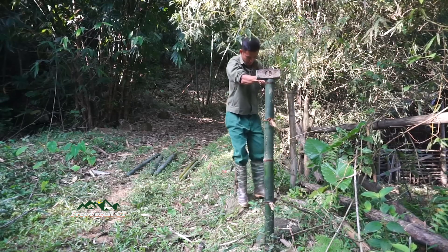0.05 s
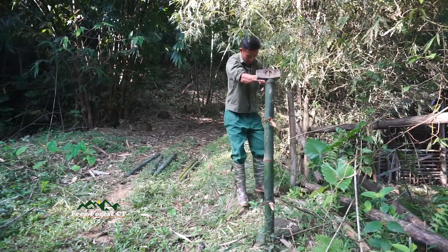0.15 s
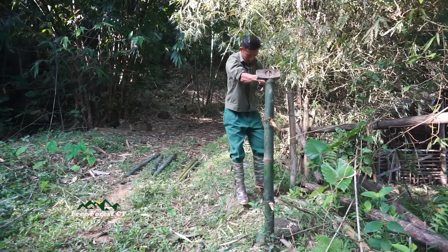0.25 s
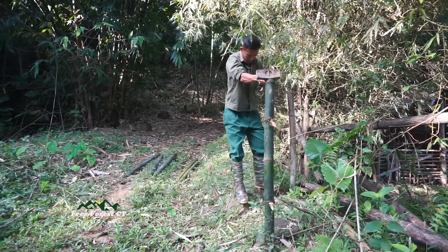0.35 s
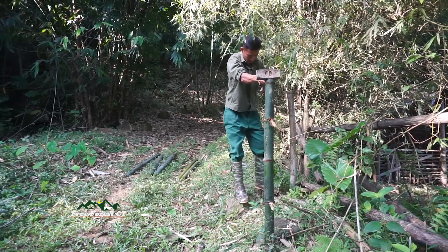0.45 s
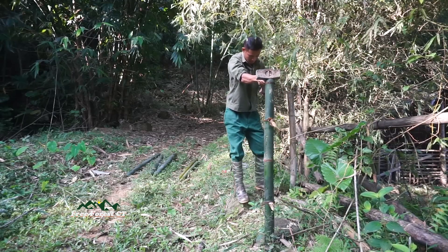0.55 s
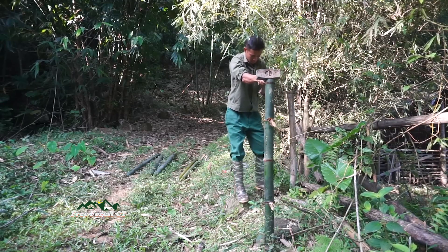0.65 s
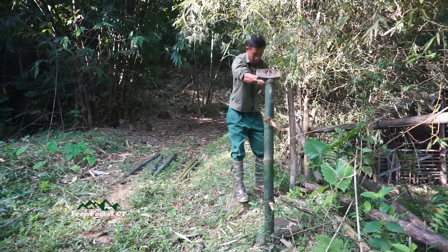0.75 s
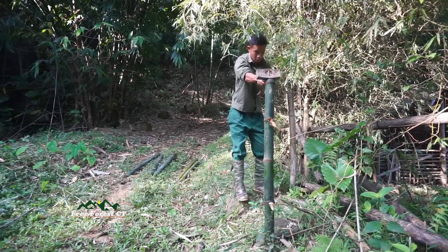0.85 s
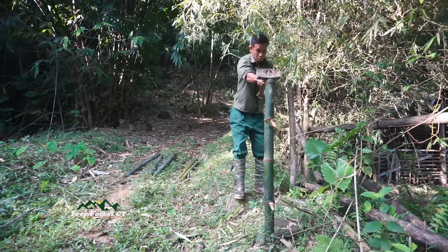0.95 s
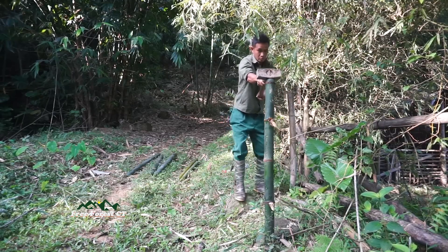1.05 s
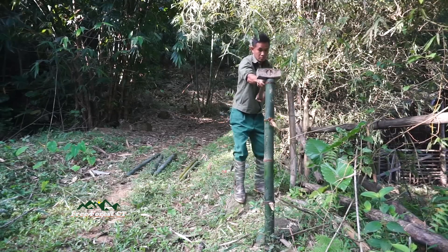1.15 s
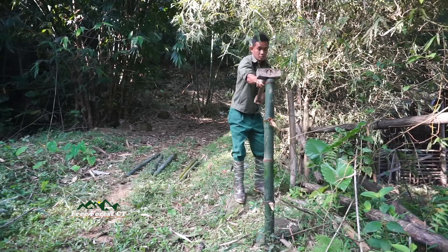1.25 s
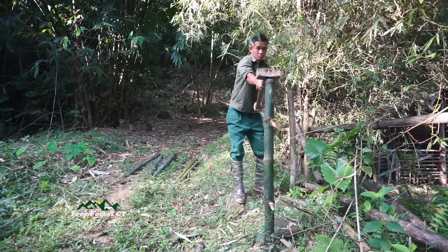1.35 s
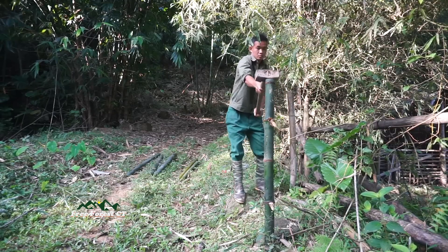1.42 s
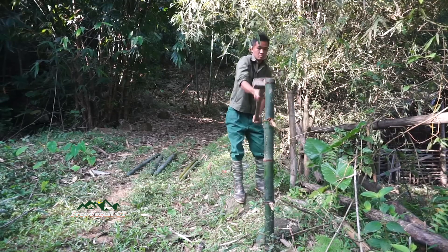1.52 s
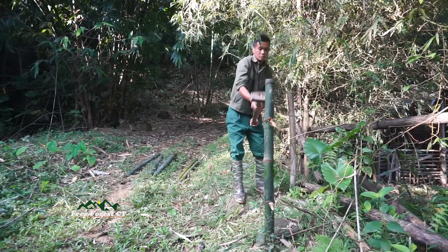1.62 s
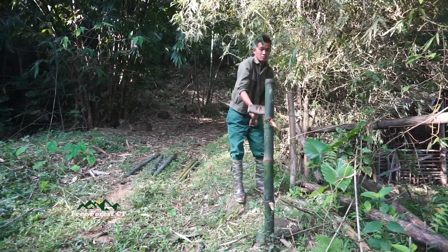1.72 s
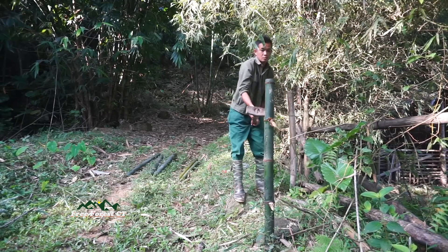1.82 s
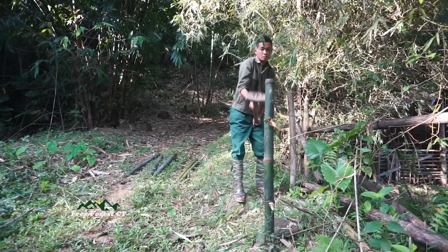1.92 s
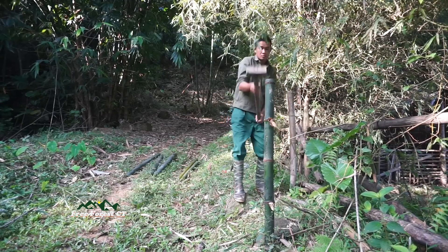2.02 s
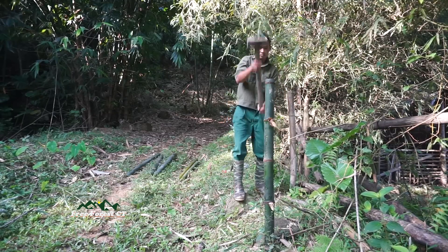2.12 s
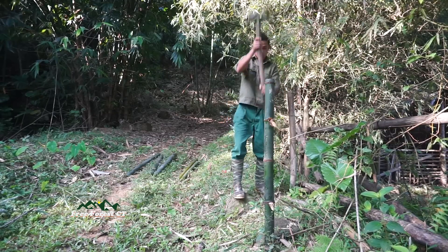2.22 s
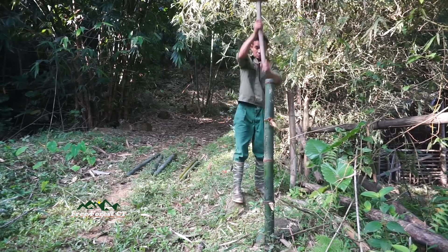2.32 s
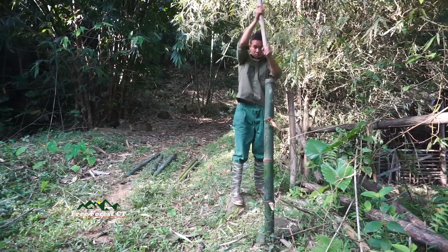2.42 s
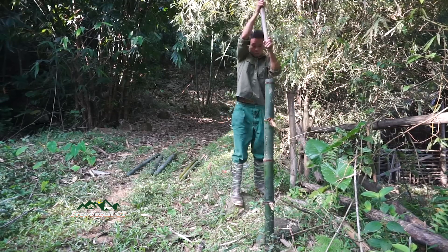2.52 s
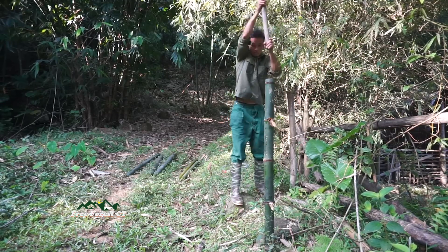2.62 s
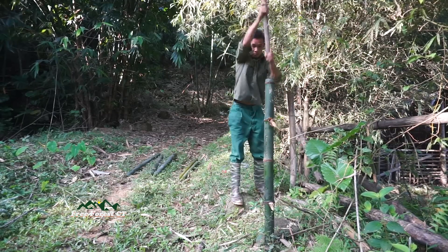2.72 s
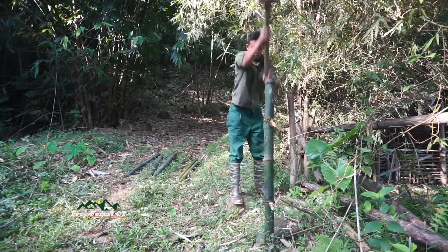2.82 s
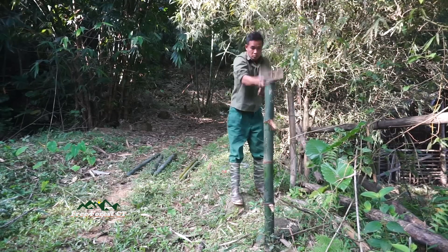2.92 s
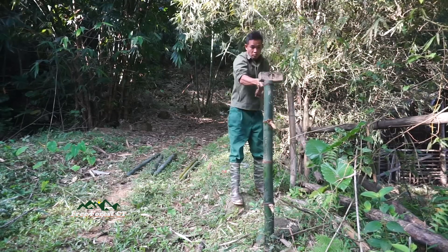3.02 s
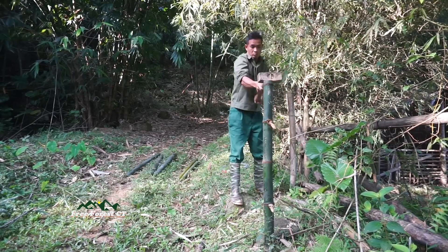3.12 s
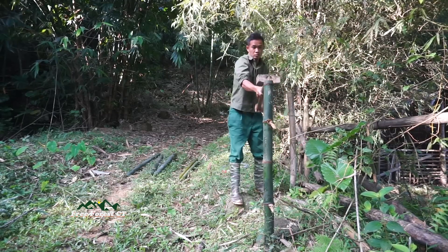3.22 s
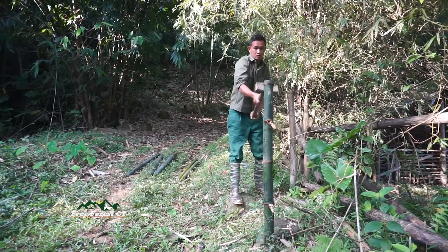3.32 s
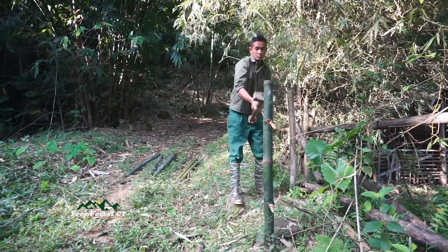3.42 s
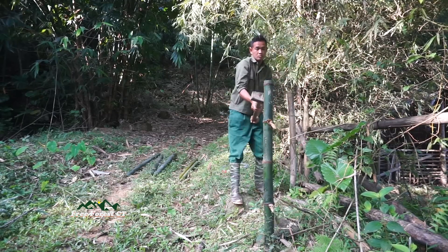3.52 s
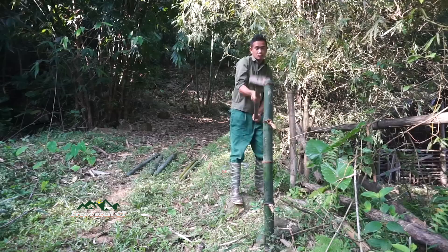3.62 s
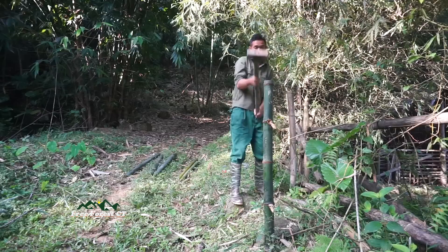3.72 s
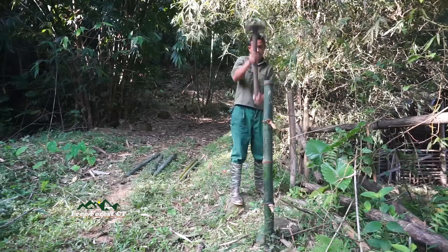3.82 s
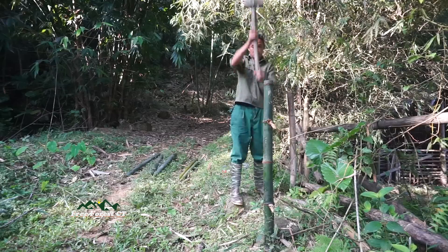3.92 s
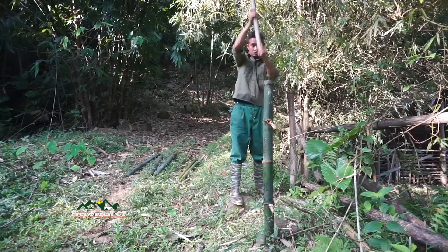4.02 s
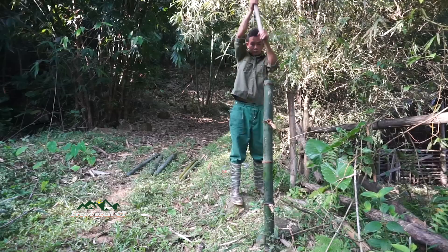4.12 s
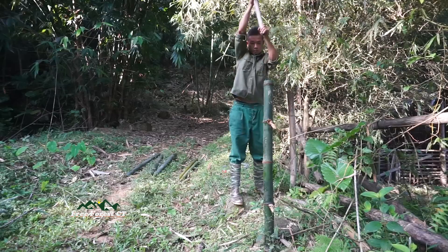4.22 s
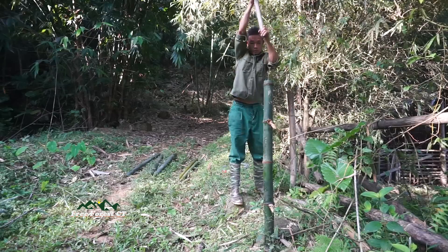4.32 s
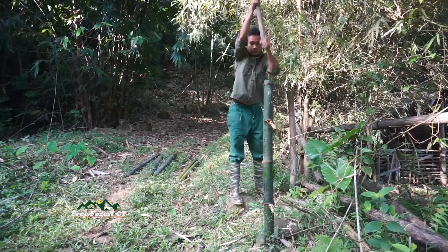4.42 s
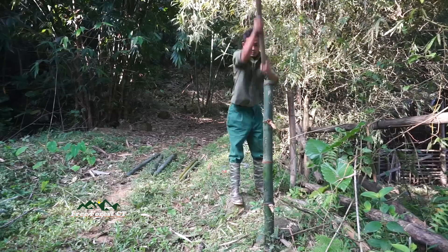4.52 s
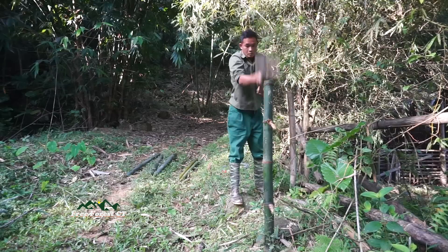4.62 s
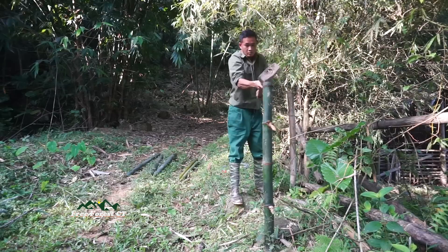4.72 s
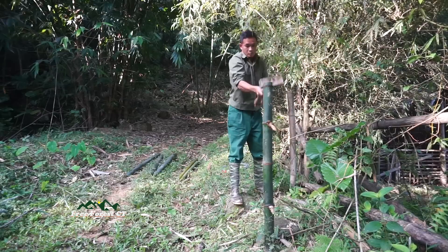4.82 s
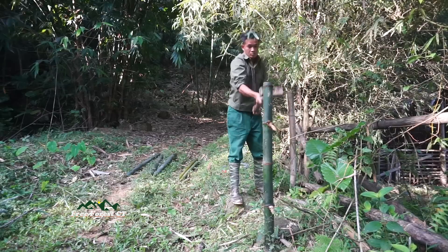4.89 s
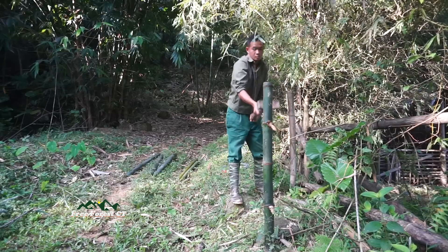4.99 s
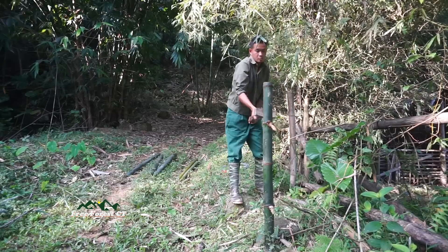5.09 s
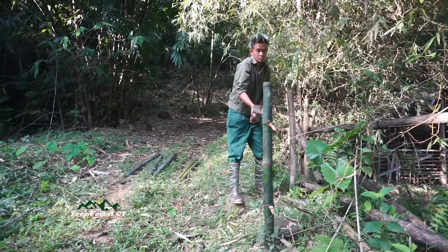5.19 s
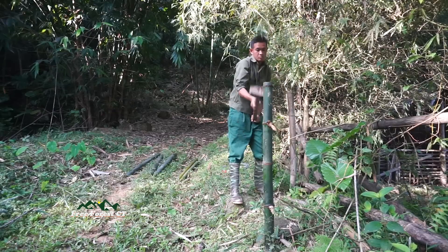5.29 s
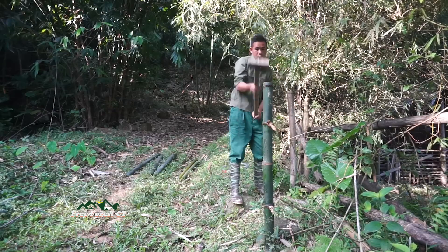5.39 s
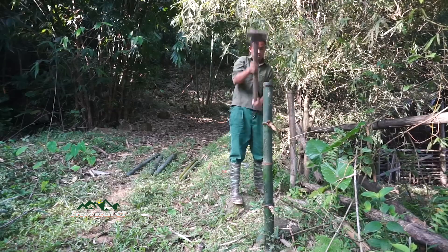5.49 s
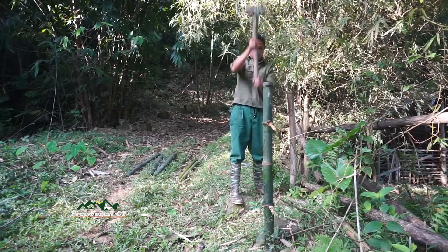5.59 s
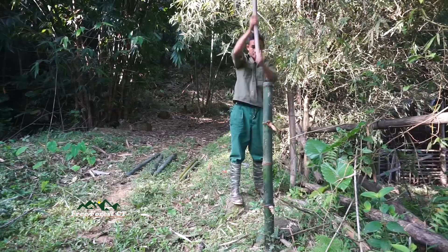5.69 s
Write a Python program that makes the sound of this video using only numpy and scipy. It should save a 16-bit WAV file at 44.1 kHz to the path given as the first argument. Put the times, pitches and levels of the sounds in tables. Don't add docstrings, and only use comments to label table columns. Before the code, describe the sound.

Two sharp, hollow knocks of a mallet on a green post echo through a forest over steady high insect drone and faint brook gurgles.

```python
import sys
import numpy as np
from scipy import signal
from scipy.fft import rfft, irfft, next_fast_len
from scipy.io import wavfile

SR = 44100
rng = np.random.default_rng(int(sys.argv[2]) if len(sys.argv) > 2 else 0)


def level_to_linear(level):
    exponent = np.asarray(level, float) / 20
    return 10 ** exponent


def int16_out(signal):
    q = np.round(np.clip(np.atleast_2d(signal).T, -1, 1) * 32767)
    wavfile.write(sys.argv[1], SR, q.astype(np.int16))


N = 253575

# start in seconds, swell of echoes in dB, ring of the steel in dB,
# steel pitch in Hz, seconds until the head is pulled away, rise of the ring in seconds.
BLOWS = [
    (2.989, -21, -28, 7038, 0.32, .029),
    (4.699, -21, -33.5, 7037, 0.35, .022),
]
# start in seconds, mode of the post in Hz, level in dB, t60 in seconds.
JOLTS = [(2.9890, 5300, -14, .0015), (2.9890, 10300, -30, .004), (2.9890, 2170, -14.5, 0.014),
         (2.9922, 2250, -22, .014), (2.9912, 6200, -25, .004), (2.9915, 1150, -19, .012),
         (2.9890, 3400, -22, 0.015), (2.9891, 5000, -31, .008), (2.9891, 7000, -22, .005),
         (2.9896, 6300, -29, 0.0071), (2.9884, 1300, -33, 0.0045), (2.9903, 3200, -36, 0.0066),
         (2.9912, 790, -14.5, 0.025), (2.99, 1028, -20, 0.05), (2.9940, 1500, -17, 0.009),
         (2.9915, 500, -21, 0.03), (2.9915, 290, -30, 0.017), (2.9968, 707, -17, 0.028),
         (2.9875, 3000, -36, .006), (3.001, 900, -25, .015), (3.0857, 680, -23.5, 0.019),
         (3.0855, 490, -34, 0.0099), (4.6996, 2450, -15.5, 0.0075), (4.6998, 5400, -14, 0.0027),
         (4.6996, 8160, -23.5, 0.0044), (4.7012, 1080, -16.5, 0.014), (4.702, 1300, -21, 0.04),
         (4.7035, 3030, -25, 0.011), (4.7030, 540, -22, 0.022), (4.7068, 510, -23, .025),
         (4.7125, 2500, -25, .012), (4.7035, 4200, -25, .01), (4.7045, 1400, -23, .012),
         (4.6997, 9900, -26, .004), (4.7048, 5100, -23, .006), (4.7030, 270, -33, 0.07),
         (4.7066, 720, -21, 0.025), (4.7083, 1250, -18.5, 0.026), (4.7108, 2050, -23, 0.022),
         (4.7172, 1450, -26, 0.015)]
# time in seconds, loss left in dB,
# loss right in dB, half width in seconds, extra lag of the right port in radians.
DEAD_SIDES = [(3.016, 10, 8, .003, 0), (4.723, 6, 6, .002, 0), (4.78, 10, 10, .004, .8),
              (3.176, 3.5, 1, 0.024, 0.15), (3.312, 4.5, 3, .012, 0), (3.355, 7.5, 6, 0.019, -.3),
              (3.436, 11, 7, 0.024, .2), (3.54, 0.5, 5, 0.055, .3), (4.805, 10, 12, 0.014, 1.2),
              (4.873, 11, 4, 0.009, .6), (4.91, 7, 0, .02, 1.3), (4.973, 10, 5, 0.0097, 0),
              (5.006, 11, 10, 0.015, .8), (5.04, 6, 3, .02, 0), (5.073, 12, 5, 0.0067, 0),
              (5.11, 14, 12, 0.008, 0), (5.2, 26, 10, 0.034, 2.0), (5.3, 8, 4, 0.013, 0)]
# mode in Hz, level in dB, t60 in seconds.
POST_VOICES = [
    [(1280, -15, 0.04), (2510, -15, 0.03), (2210, -19, .04), (3260, -18, .02), (3670, -18, 0.03)],
    [(1270, -13, 0.05), (1930, -16, 0.022), (2200, -18, .025), (2940, -19, .025), (3240, -20, .025),
     (3550, -19, .03)],
]
# frequency in Hz, level in dB.
ECHO_COLOUR = [(100, -78), (200, -18.5), (330, -17.5), (650, -1.5), (1000, -6), (1280, 0), (1760, 0),
               (2500, 0), (3600, -2), (5200, -6.5), (7500, -8.5), (9500, -18), (11300, -12.5)]
# frequency in Hz, change in dB per second.
ECHO_LOSS = [(150, -30), (400, -56), (1000, -9), (3000, -17), (5500, -38), (8000, -34), (11000, -56)]
# frequency in Hz, likeness from 0 to 1.
ECHO_ALIKE = [(150, 0.93), (600, .96), (1200, .95), (2300, 0.85), (4000, 0.62), (5800, .5), (9000, 0.3)]
# strongest rustle in seconds, level in dB, rise in seconds, fall in seconds.
MOVES = [(.32, -56.5, 0.12, 0.12), (2.3, -53, .1, 0.13), (2.49, -51.5, 0.094, 0.077),
         (2.73, -53.5, 0.063, 0.13), (3.93, -58.5, 0.021, 0.18), (4.2, -49.5, 0.14, 0.059),
         (4.5, -61.5, 0.22, 0.18), (5.75, -54.5, 0.17, .1)]
# frequency in Hz, level in dB per Hz.
RUSTLE_COLOUR = [(300, -13), (700, 6), (1500, -6), (3000, -2), (6000, 0), (8000, 4), (11300, 5.5)]
# frequency in Hz, likeness from 0 to 1.
RUSTLE_ALIKE = [(300, 0.61), (11000, 0.77)]
# start in seconds, level in dB, low edge in Hz, high edge in Hz, t60 in seconds.
SNAPS = [(2.258, -41, 2000, 6000, .03), (2.277, -39, 1800, 4000, 0.022), (2.372, -36, 7000, 10000, .008),
         (2.4515, -28, 2200, 12100, 0.025), (2.4562, -28.5, 2200, 12200, 0.018),
         (2.459, -36, 2500, 11000, .03), (2.462, -29, 6300, 8000, 0.03), (2.4622, -31, 9000, 11600, 0.03),
         (2.466, -38.5, 1500, 11000, 0.048), (2.71, -34, 6000, 9000, 0.035),
         (3.909, -36, 5000, 10000, .012), (3.954, -36, 4000, 8000, .015), (3.989, -46, 4000, 9000, .01),
         (4.148, -29, 5000, 14000, 0.013), (4.189, -50, 6000, 11000, .03), (4.324, -40, 5000, 11000, .01),
         (4.331, -35, 4000, 12000, .015), (5.603, -39.5, 2000, 9000, 0.021)]
# middle in seconds, level in dB.
PUFFS = [(2.319, -73), (2.449, -75), (3.07, -72), (4.719, -68), (4.86, -86), (5.598, -76)]
# start in seconds, peak in dB, pitch in Hz.
GURGLES = [(0.0543, -56, 1120), (0.1191, -51, 1130), (0.1446, -44.5, 1090), (0.386, -45.5, 1110),
           (0.5117, -48, 1130), (0.5641, -44.5, 1130), (0.612, -47, 1130), (0.8106, -47, 1130),
           (0.8894, -45.5, 1090), (0.9996, -40, 1130), (1.3528, -42, 1070), (1.709, -45.5, 1170),
           (1.8427, -46.5, 1350), (1.956, -47, 1016), (1.9754, -48, 996), (2.0303, -51, 1130),
           (2.2099, -49, 1064), (2.4154, -45.5, 1075), (2.4553, -49, 1160), (2.7501, -43.5, 1130),
           (2.7716, -47, 1380), (3.5691, -45.5, 1130), (3.6209, -41.5, 1160), (4.1837, -44.5, 1130),
           (4.3079, -48, 1150), (4.4062, -48, 1170), (4.6092, -56, 1105), (5.3204, -47, 1180),
           (5.501, -44, 1130), (5.5699, -41, 1130)]
# start in seconds, peak in dB, pitch in Hz.
GLUGS = [(0.043, -51.5, 333), (0.204, -55, 276), (0.368, -47, 830), (0.82, -48.5, 372), (0.936, -54, 404),
         (1.0, -46.5, 532), (1.074, -51, 403), (1.341, -58, 336), (1.874, -54, 520), (1.976, -54, 830),
         (2.032, -44, 433), (2.23, -48.5, 536), (2.493, -51, 830), (2.825, -52, 363), (2.941, -54, 340),
         (3.543, -49, 584), (3.77, -53.5, 330), (3.928, -52, 367), (4.128, -50, 690), (4.294, -49.5, 497),
         (4.354, -48.5, 398), (4.399, -53, 514), (4.661, -47, 584), (1.723, -56, 510), (2.392, -53, 490),
         (3.955, -47, 810), (3.98, -55, 292), (4.44, -51, 522), (5.463, -55, 524), (5.592, -54.5, 368)]
# multiple of its pitch, level in dB.
OVERTONES = [(1.26, -12), (1.95, -17), (2.5, -20)]
# time in seconds, level in dB.
FLOW = [(0, 4), (.15, -4.5), (.65, -4), (.9, 0), (1.5, -1.5), (1.86, 0.5), (2.1, -5), (2.4, 0.5),
        (2.58, -5.5), (2.85, 0), (3.65, -2.5), (4.45, -2), (5.2, 1), (5.5, -5.5), (5.75, -0.5)]
# mode in Hz, level to the pool in dB, t60 in seconds.
NARROW_PATTER = [(1130, 1.5, 0.049), (1228, -3.5, 0.027), (1025, -6.5, 0.072), (1416, -6.5, 0.039),
                 (2200, -6, 0.015)]
# mode in Hz, level to the pool in dB, t60 in seconds.
WIDE_PATTER = [(327.5, -6.5, 0.028), (417.7, -7, 0.06), (517, -4, 0.045), (720, -35, 0.027)]
# pitch in Hz, width in Hz, wing strokes per second,
# stroke depth from 0 to 1, level to the chorus in dB, likeness at the ports from 0 to 1.
CHOIRS = [(4615, 246, 100, 0.04, -2, 0.71), (4671, 392, 140, 0.12, -1, 0.8), (7065, 650, 90, 0.06, -6, .6),
          (8735, 710, 100, 0.43, -4.5, 0.65)]
# pitch in Hz, width in Hz, wing strokes per second,
# stroke depth from 0 to 1, level to the chorus in dB, likeness at the ports from 0 to 1.
THROBBERS = [(9480, 580, 73, 0.02, -2, .7), (8840, 200, 140, .2, -6.5, .7)]
# time in seconds, throbs per second of the high one, of the low one.
THROB_PER_S = [(0, 4.33, 4.02), (1.2, 4.45, 4.16), (1.6, 4.65, 4.21), (5.75, 4.57, 4.69)]
# frequency in Hz, level in dB per Hz.
AIR_COLOUR = [(25, -44), (60, -30), (120, -21.5), (200, -16.5), (300, -7), (700, -2), (1600, -3),
              (3000, -3), (3900, -4), (5600, -7), (7800, -9.5), (10300, -6), (11300, -11.5)]
# frequency in Hz, likeness from 0 to 1.
AIR_ALIKE = [(100, 0.75), (300, 0.75), (700, 0.6), (1500, 0.65), (2500, .45), (5500, 0.3), (10000, 0.4)]
# time in seconds, pitch in Hz, level in dB.
CROW = [(5.59, 495, -68), (5.63, 503, -63), (5.66, 510, -55), (5.7, 512, -56), (5.75, 514, -56)]
# multiple of the pitch, level in dB.
CROW_PARTIALS = [(1, -2), (2, 1.5), (3, -8), (4, -5), (5, -15)]
# frequency in Hz, loss in dB.
DULLER = [(100, 3), (250, 0.5), (600, 2.5), (1100, 4), (2000, 5), (3600, 8.5), (6400, 10.5), (11400, 10.5)]
# frequency in Hz, phase lead in radians.
LEAD = [(60, 0.25), (290, 1.33), (500, 1.72), (1100, 1.93), (2500, 1.82), (11000, 1.67)]

POST_LAG_S, STEEL_LAG_RAD = 1.6e-5, .6
THUD_S, THUD_HZ, THUD_DB, THUD_T60_S = 3.0845, 215, -38, .025
STEEL_LOSS_DB_PER_S, STEEL_AWAY_DB_PER_S, STEEL_SAG_HZ_PER_S = 24, 53, 14.1
GROUND_DB = -11, -6
GROUND_RISE_S, GROUND_T60_S = .006, 0.11
TRUNKS_RISE_S, TRUNKS_T60_S = 0.088, .5
FAR_DB, FAR_T60_S = -10, 1.253
VOICE_LOSS_DB_PER_S = 35
NARROW_DB, WIDE_DB, POOL_SWAY_DB = -64, -62.5, 2.2
POOL_ALIKE = .75
SPLASHES_PER_S, SPLASH_DB, SPLASH_CYCLES = 65, -70, 40.0
CHORUS_DB, CHORUS_SWAY_DB = -53.5, 0.04
THROB_GAP_TURNS, THROB_DEPTH_DB = .25, (-13, -9)
DUCK_DB, DUCK_AFTER_S, DUCK_RECOVER_S = 2, 0.082, 0.4
BASS_CUT_HZ = 250


def rms_one(x):
    return x / np.sqrt(np.mean(x ** 2) + 1e-20)


def in_time(rows, off=None):
    s, *columns = np.transpose(rows)
    return [np.interp(np.arange(N) / SR, s, c, off, off) for c in columns]


def at_hz(points, hz):
    points_hz, values = np.transpose(points)
    return np.interp(np.log(hz), np.log(points_hz), values)


def age_after(s):
    return np.maximum(np.arange(N) / SR - s, 0)


def drift(rate, count=N):
    r = np.exp(-80 * np.pi * rate / SR)
    noise = rng.standard_normal(N // 40 + 2002)
    slow = signal.lfilter([1], [1, -2 * r, r * r], noise)[2000:]
    return np.interp(np.arange(count) / 40, np.arange(len(slow)), rms_one(slow))


def ring(clicks, hz, t60):
    r, w = level_to_linear(-60 / (t60 * SR)), 2 * np.pi * hz / SR
    return signal.lfilter([0, np.sin(w)], [1, -2 * r * np.cos(w), r * r], clicks + 1e-18)


def band(x, low_hz, high_hz):
    return signal.sosfilt(signal.butter(2, [low_hz, high_hz], "band", fs=SR, output="sos"), x)


def bass_cut(x):
    return signal.sosfilt(signal.butter(4, BASS_CUT_HZ, "high", fs=SR, output="sos"), x)


def ports(pair, alike):
    alike = np.clip(alike, 0, 1)
    return np.array([pair[0], alike * pair[0] + np.sqrt(1 - alike ** 2) * pair[1]])


def grains(per_s, spread_db, shape):
    sizes = level_to_linear(spread_db * np.minimum(rng.exponential(1, shape), 5)) * rng.choice([-1, 1], shape)
    return rms_one(sizes * (rng.random(shape) < per_s / SR))


def coloured(source, band_db, alike, from_octave=0):
    out, edges = 0, 22 * 2 ** np.arange(from_octave, 9.4, 1 / 3)
    for k, (low, high) in enumerate(zip(edges, edges[1:])):
        hz = np.sqrt(low * high)
        out = out + level_to_linear(band_db(hz)) * ports(band(source[k % 2], low, high), at_hz(alike, hz))
    return out


def place(out, s, sound):
    at, out = round(s * SR), out.copy()
    out[..., at:at + sound.shape[-1]] += sound[..., :N - at]
    return out


def blows():
    out, click = np.zeros(N), 1. * (np.arange(4000) == 0)
    for s, hz, db, t60 in JOLTS:
        out = place(out, s, level_to_linear(db) * ring(click, hz, t60))
    thud = level_to_linear(THUD_DB) * band(ring(click, THUD_HZ, THUD_T60_S), 144, 600)
    out = place(bass_cut(bass_cut(out)), THUD_S, thud)
    late = np.interp(np.arange(N) - POST_LAG_S * SR, np.arange(N), out)
    return np.array([out, late]) * level_to_linear([[-.5], [1.6]])


def steel():
    t, out, turning = np.arange(N) / SR, 0, 0
    for s, left_db, right_db, width, lag in DEAD_SIDES:
        turning = turning + np.exp(-((t - s) / width) ** 2) * np.array([[left_db], [right_db], [lag]])
    lags = np.array([0 * t, STEEL_LAG_RAD + turning[2]])
    for s, _, db, hz, away_s, rise_s in BLOWS:
        age = age_after(s)
        fade_db = -STEEL_LOSS_DB_PER_S * age - STEEL_AWAY_DB_PER_S * np.maximum(age - away_s, 0)
        turns = (hz - STEEL_SAG_HZ_PER_S * age / 2) * age
        swell = 1 - np.exp(-(age / rise_s) ** 2)
        out = out + level_to_linear(db + fade_db) * swell * np.sin(2 * np.pi * turns - lags)
    return np.sqrt(2) * level_to_linear(-turning[:2]) * out


def answer(age, ground_db):
    forest = level_to_linear(-120 * age / TRUNKS_T60_S) + level_to_linear(2 * FAR_DB - 120 * age / FAR_T60_S)
    late = 1 - np.exp(-(age / TRUNKS_RISE_S) ** 3)
    gather = 1 - np.exp(-(age / GROUND_RISE_S) ** 2)
    soil = gather * level_to_linear(2 * ground_db - 120 * age / GROUND_T60_S)
    return np.sqrt(soil + late * forest)


def echoes():
    out = np.zeros((2, N))
    age = np.arange(round(.8 * SR)) / SR
    for (s, swell_db, *_), tilt_db, voice, ground_db in zip(BLOWS, (.1, -.5), POST_VOICES, GROUND_DB):
        trunks = grains(6000, 2.1, (2, 2, len(age)))

        def band_db(hz):
            clumps_db = 1.5 * drift(45, count=len(age))
            colour = at_hz(ECHO_COLOUR, hz) + tilt_db * abs(np.log2(hz / 1800))
            return colour + at_hz(ECHO_LOSS, hz) * (age - .08) + clumps_db
        swell = rms_one(coloured(trunks, band_db, ECHO_ALIKE, from_octave=2))
        for hz, db, t60 in voice:
            mode = rms_one(band(ring(trunks[0], hz, t60), hz / 2, hz * 2))
            fade = level_to_linear(db - VOICE_LOSS_DB_PER_S * (age - 0.33))
            swell = swell + fade * ports(mode, at_hz(ECHO_ALIKE, hz))
        swell = swell / np.sqrt(np.mean(band(swell[0], 900, 3800) ** 2))
        out = place(out, s, swell * level_to_linear(swell_db) * answer(age, ground_db))
    return out


def swing():
    t = np.arange(N) / SR
    return sum(level_to_linear(db - 10 * np.where(t < s, (s - t) / rise, (t - s) / fall))
               for s, db, rise, fall in MOVES)


def leaves():
    clicks = grains(5000, 3.5, (2, 2, N))
    crackle = coloured(clicks, lambda hz: at_hz(RUSTLE_COLOUR, hz), RUSTLE_ALIKE, from_octave=4)
    out = swing() * level_to_linear(3.0 + 2.0 * drift(25)) * rms_one(crackle)
    t = np.arange(3000) / SR
    for s, db, low_hz, high_hz, t60 in SNAPS:
        snap = band(rng.standard_normal((2, len(t))) * level_to_linear(-60 * t / t60), low_hz, high_hz)
        out = place(out, s, level_to_linear(db) * ports(snap, 0.88))
    return out


def puffs():
    out, swell = np.zeros((2, N)), np.hanning(2200)
    for s, db in PUFFS:
        push = rms_one(band(rng.standard_normal((2, len(swell))), 16, 195))
        out = place(out, s - .025, level_to_linear(db) * swell * push)
    return out


def bubble(hz, cycles):
    t = np.arange(round(4 * cycles / hz * SR)) / SR * hz / cycles
    return np.e * 3 * t * np.exp(-3 * t) * np.sin(2 * np.pi * cycles * t * (1 + .01 * t))


def clear_bubbles(rows, cycles):
    out = np.zeros((2, N))
    for (s, db, hz), chance_db in zip(rows, rng.normal(0, 4, (len(rows), 3))):
        plop = np.pad(bubble(hz, cycles), (0, SR // 10))
        for (k, level_db), luck_db in zip(OVERTONES, chance_db):
            overtone = bubble(k * hz, cycles)
            plop[:len(overtone)] += level_to_linear(level_db + luck_db) * overtone
        out = place(out, max(s - .002, 0), level_to_linear(db - 1.5) * plop)
    return out


def patter(modes, pool_db):
    out, pool_db = 0, pool_db + POOL_SWAY_DB * drift(2.8)
    for hz, db, t60 in modes:
        mode = rms_one(ring(ring(grains(350, 3.6, N), hz, t60 / 3), hz, t60))
        out = out + level_to_linear(pool_db + db) * ports([mode, mode[::-1]], POOL_ALIKE)
    return out


def splashes():
    drops, dealt = grains(SPLASHES_PER_S, 4.2, N), rng.integers(0, 12, N)
    pitches = np.geomspace(597, 3570, 12)
    splash = sum(ring(drops * (dealt == k), hz, SPLASH_CYCLES / hz) for k, hz in enumerate(pitches))
    return rms_one(ports([splash, np.roll(splash, N // 2)], POOL_ALIKE))


def brook():
    flow_db, = in_time(FLOW)
    clear = clear_bubbles(GURGLES, cycles=13.0) + clear_bubbles(GLUGS, cycles=7.0)
    faint = patter(NARROW_PATTER, NARROW_DB + flow_db) + patter(WIDE_PATTER, WIDE_DB + flow_db)
    return clear + faint + level_to_linear(SPLASH_DB + flow_db) * splashes()


def choir(hz, width_hz, per_s, depth, db, alike):
    strokes = np.cos(2 * np.pi * per_s * np.cumsum(1 + 0.0275 * drift(2.8)) / SR)
    buzz = rng.standard_normal((2, N)) * (1 + np.clip(depth, 0, 1) * strokes) * level_to_linear(0.25 * drift(26))
    buzz = band(band(buzz, hz - width_hz / 2, hz + width_hz / 2), hz - width_hz, hz + width_hz)
    return level_to_linear(db) * ports(rms_one(buzz), alike)


def insects():
    out = sum(choir(*row) for row in CHOIRS)
    for singer, per_s, depth_db in zip(THROBBERS, in_time(THROB_PER_S), THROB_DEPTH_DB):
        turn = np.cos(2 * np.pi * (np.cumsum(per_s) / SR - THROB_GAP_TURNS))
        pause = np.clip((turn + .3) / 1.3, 0, 1) ** 1.5
        out = out + level_to_linear(depth_db * pause) * choir(*singer)
    return out


def air():
    together = drift(5)

    def band_db(hz):
        flicker_db = np.clip(1500 / hz, .8, 2.5) * drift(6.4) + 1.3 * together
        return at_hz(AIR_COLOUR, hz) + flicker_db
    noise = rng.standard_normal((2, 2, N))
    return level_to_linear(-3.5) * rms_one(coloured(noise, band_db, AIR_ALIKE)) * level_to_linear([[0], [3]])


def rooster():
    hz, db = in_time(CROW)
    turn = 2 * np.pi * np.cumsum(hz) / SR
    call = sum(level_to_linear(level_db + 3 * drift(20)) * np.sin(k * turn) for k, level_db in CROW_PARTIALS)
    return level_to_linear(db) * call * (np.arange(N) > CROW[0][0] * SR)


def ducking():
    out = 0
    for s, *_ in BLOWS:
        age = np.maximum(age_after(s) - DUCK_AFTER_S, 0) / DUCK_RECOVER_S
        out = out - DUCK_DB * np.e * age * np.exp(-age) * np.exp(-(age / 3) ** 2)
    return out


def scene():
    near = blows() + steel() * level_to_linear([[0], [1.5]]) + echoes() + leaves() + puffs()
    chorus = level_to_linear(CHORUS_DB + CHORUS_SWAY_DB * drift(0.46)) * (insects() + air())
    return near + level_to_linear(ducking()) * (chorus + bass_cut(brook())) + rooster()


def band_limit(x):
    return signal.sosfilt(signal.butter(12, 12040, fs=SR, output="sos"), x)


def record(dry):
    size = next_fast_len(N + 4096)
    hz = np.maximum(np.arange(size // 2 + 1) * SR / size, 1)
    right = level_to_linear(-at_hz(DULLER, hz)) * np.exp(1j * at_hz(LEAD, hz))
    top = level_to_linear(np.interp(hz, [11030, 11120, 11700, 15000], [0, -40, -50, -80]))
    flat_sum = np.sqrt((1 + np.abs(right) ** 2) / 4)
    pair = top * np.array([np.ones_like(right), right]) / flat_sum
    mix = irfft(rfft(dry, size) * pair, size)[:, :N]
    return band_limit(mix)


dry = scene()
out = record(dry)
int16_out(out)
```